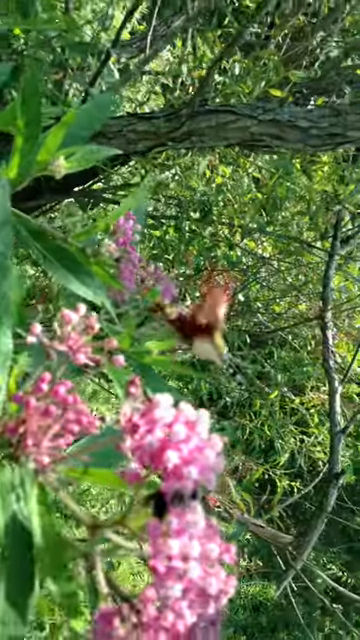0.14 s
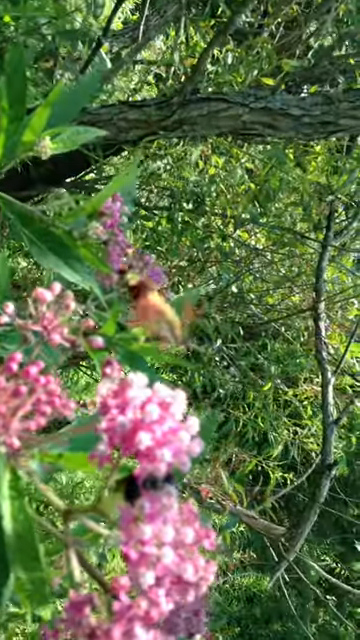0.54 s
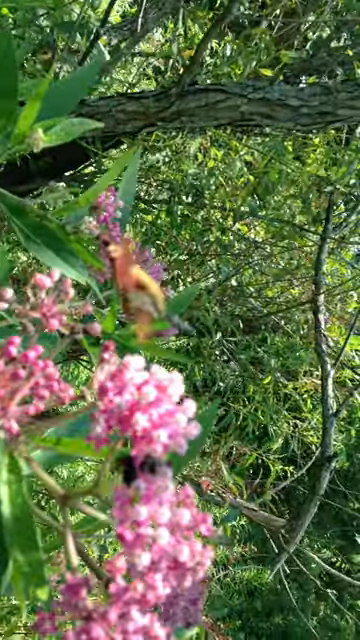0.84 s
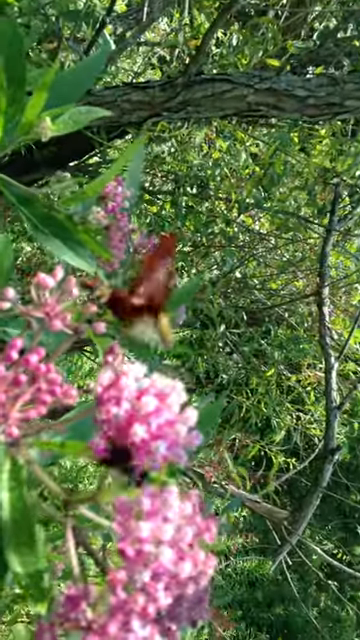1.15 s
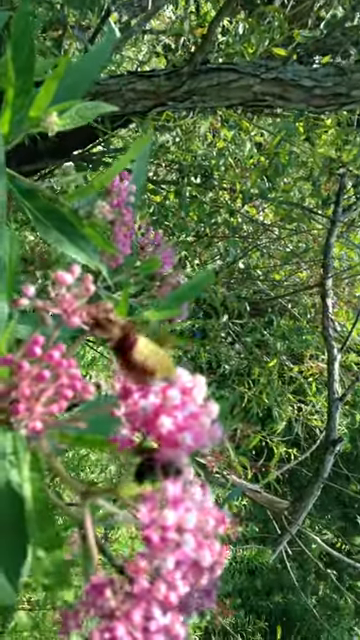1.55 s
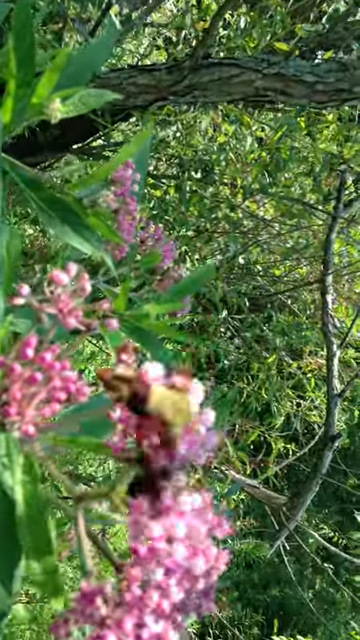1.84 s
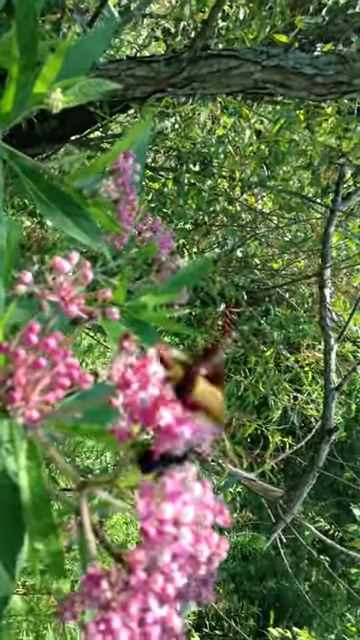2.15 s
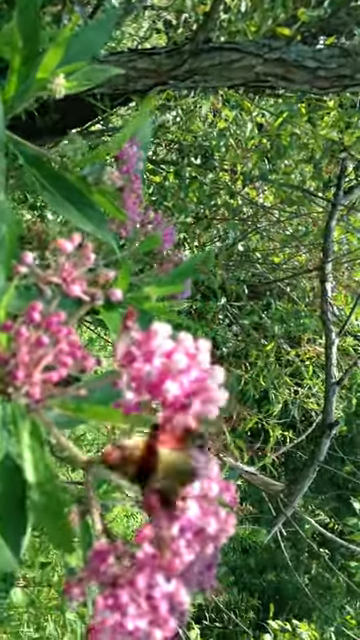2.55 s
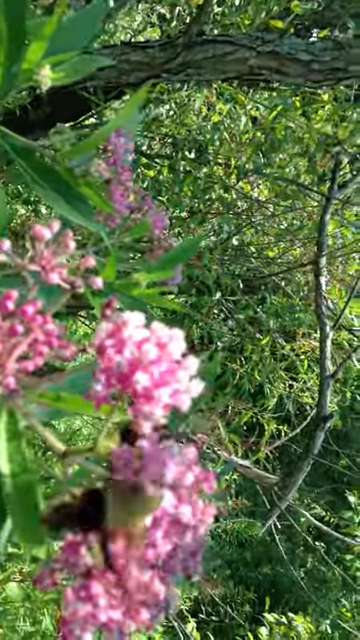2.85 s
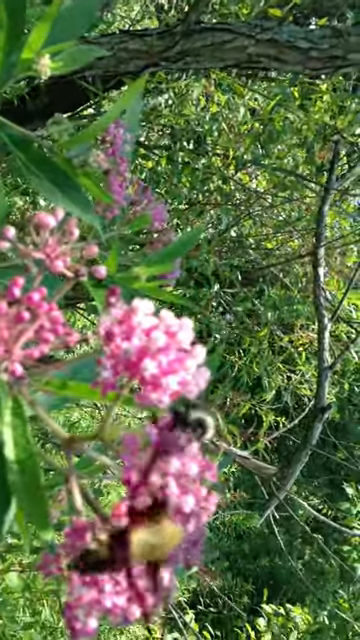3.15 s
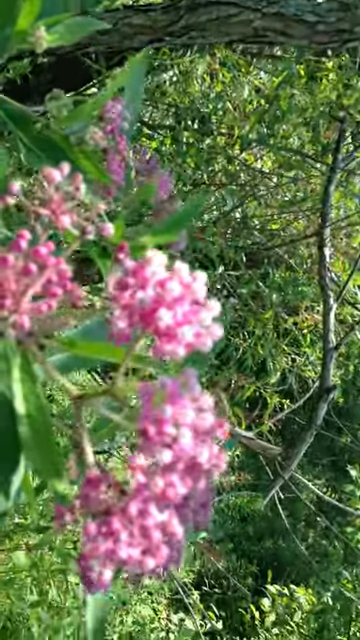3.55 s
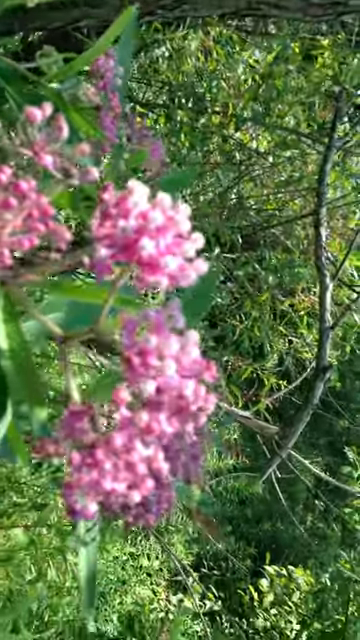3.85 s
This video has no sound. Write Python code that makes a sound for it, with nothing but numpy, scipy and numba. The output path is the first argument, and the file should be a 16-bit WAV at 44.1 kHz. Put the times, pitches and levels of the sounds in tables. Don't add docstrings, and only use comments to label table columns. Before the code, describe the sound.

A bumblebee's low buzz swells suddenly loud close past the microphone after quiet outdoor hiss

```python
import sys
import numpy as np
from scipy import signal
from scipy.fft import rfft, irfft
from scipy.io import wavfile
from scipy.ndimage import uniform_filter1d
from numba import njit

SR = 44100
rng = np.random.default_rng(int(sys.argv[2]) if len(sys.argv) > 2 else 0)


def nominal_scale(level):
    x = np.asarray(level, float) / 20
    return 10 ** x


def generate_wav(sig):
    pcm = np.round(np.clip(np.atleast_2d(sig).T, -1, 1) * 32767).astype(np.int16)
    wavfile.write(sys.argv[1], SR, pcm)


N = 176400

# pitch_hz, density_db (dB per Hz)
AIR_SPECTRUM = [(18, -35), (40, -17.5), (120, -2.5), (320, -7), (520, -10.5), (1240, -18.5), (4200, -17.5),
                (15000, -22.5)]
# start_s, firing_hz, level_db
ENGINE_FIRING = [
    (0, 20.1, -64.5),
    (.5, 20.1, -65),
    (.72, 20.1, -68.5),
    (1.0, 20.1, -66),
    (1.3, 20.1, -68),
    (1.45, 20.1, -74),
    (2.2, 20.1, -73),
    (4, 20.1, -75),
]
# resonance_hz, width_hz, level_db
ENGINE_RESONANCES = [
    (335, 65, 0),
    (410, 130, -5),
    (600, 200, -18),
]
# start_s, level_db, centre_hz
MOTH_PUFFS = [(0, -73, 192), (.3, -84.5, 202), (.5, -63, 189), (.66, -79, 210), (1.05, -71, 222),
              (1.24, -65, 197), (1.4, -74, 218), (1.56, -64, 236), (1.82, -62, 195), (2.0, -62, 225),
              (2.15, -62.5, 219), (2.25, -71, 171), (2.7, -67.5, 210), (3.05, -61.5, 200),
              (3.25, -68.5, 215), (3.47, -64, 171), (3.53, -53.5, 202), (3.6, -69, 185)]
# start_s, peak_db, pitch_hz
PORT_THUMPS = [(0.393, -61, 131), (0.562, -50, 130), (0.591, -51, 130), (1.246, -56, 132),
               (1.606, -49, 127), (1.925, -47.5, 133), (1.982, -62, 132), (2.035, -49.5, 129),
               (2.597, -53, 132), (2.983, -63, 131.7), (3.332, -48.5, 131), (3.496, -47.5, 134.4)]
# peak_s, peak_db, pitch_hz, length_s
MOTH_EDDIES = [(.505, -58.5, 176, 0.021), (.59, -57.5, 174, 0.017), (1.19, -60, 174, 0.011),
               (1.255, -62.5, 150, 0.01), (1.56, -60.5, 237, 0.032), (1.689, -62, 246, 0.023),
               (1.77, -57, 235, 0.014), (1.835, -54.5, 169, 0.012), (1.945, -50, 172, 0.012),
               (1.99, -50.5, 170, 0.0084), (2.035, -50.5, 162, 0.012), (2.141, -57, 270, 0.011),
               (2.175, -59.5, 228, 0.011), (2.985, -52.5, 175, .01), (3.075, -56.5, 184.6, 0.013),
               (3.513, -45, 166, 0.0077), (3.66, -54.5, 175, 0.022)]
# start_s, wing_beat_hz, level_db
FLOWER_FLUTTER = [
    (2.401, 127.3, -73.5),
    (2.619, 127.9, -71.5),
    (2.85, 123.6, -69),
    (3.0, 133.4, -69.5),
    (3.119, 135.7, -67.5),
    (3.23, 136.8, -68),
    (3.28, 138.2, -62.5),
    (3.33, 137.8, -58.5),
    (3.359, 132.4, -66.5),
]
# peak_s, peak_db, colour_hz, length_s
PETAL_BRUSHES = [(2.6379, -49, 6000, .0007), (2.6461, -44.5, 7000, .0014), (2.6495, -52, 5000, .001),
                 (2.6559, -47, 6000, .0006), (2.8215, -54, 9000, .0008), (2.8245, -52, 3000, .001),
                 (2.838, -55, 4500, .0008), (2.854, -52, 7000, .001), (2.862, -54, 8000, .0006),
                 (2.8698, -49.5, 7000, .0007), (2.878, -51, 7000, .001), (2.886, -54, 3500, .001),
                 (2.9114, -41.5, 8000, .0004), (2.9175, -52, 9000, .0007), (2.9202, -51, 3500, .0005),
                 (2.963, -54, 4000, .0008), (2.991, -53, 4000, .0006), (3.1147, -52, 2500, .0006),
                 (3.1195, -47, 5000, .0005), (3.1233, -51, 9500, .0006), (3.1288, -47, 6000, .0009),
                 (3.159, -52, 4000, .001), (3.166, -52, 7000, .0005), (3.1895, -48, 5000, .0007),
                 (3.1947, -45.5, 7500, .0005), (3.197, -47, 6500, .0005), (3.2165, -52, 8000, .001),
                 (3.2226, -47.5, 9500, .0009), (3.232, -52, 7000, .0007), (3.3188, -45, 6000, .0005),
                 (3.3255, -44, 8500, .0013), (3.3324, -42.5, 6500, .0011), (3.8237, -47, 9000, .0006),
                 (3.8317, -48, 9000, .0006), (3.8399, -41, 2500, .0006), (3.8486, -47, 4000, .0006),
                 (3.87, -39, 7500, .0008), (3.8776, -44, 7000, .0008), (3.886, -43, 10000, .0007),
                 (3.8921, -41, 7500, .0006), (3.8952, -44, 5500, .0007), (3.9003, -43, 7000, .0006),
                 (3.9078, -43, 6000, .001), (3.916, -40, 7000, .0007), (3.9201, -46, 6000, .0007),
                 (3.9315, -47, 5500, .0007), (3.9362, -47, 5000, .0006)]
# start_s, peak_db, pitch_hz
STEM_TICKS = [
    (3.0048, -52, 1850),
    (3.1878, -54, 1860),
    (3.4062, -55, 1532),
]
# start_s, wing_beat_hz, level_db
HOP_BUZZ = [
    (3.425, 120, -85),
    (3.442, 124, -59),
    (3.455, 127, -55.5),
    (3.478, 136, -55.5),
    (3.495, 128, -58),
    (3.512, 122, -75),
]
# start_s, wing_beat_hz
FLIGHT_BEAT = [(3.58, 116.5), (3.645, 119.5), (3.71, 139.5), (3.73, 142.5), (3.776, 142), (3.812, 132),
               (3.848, 116.5), (3.868, 115), (3.885, 122), (3.9, 127), (3.925, 131), (3.952, 119),
               (4.0, 108)]
# start_s, level_db, facing_db (odd partials over even), bright_db (per octave), lowest_partial_db
FLIGHT_APPROACH = [
    (3.58, -64.5, 3, 3, 3.5),
    (3.65, -64.5, 2, 7.5, 2),
    (3.69, -60, -4, 1.5, -4),
    (3.72, -53, -4, -2.5, -11),
    (3.745, -50, 1, -1.5, -2),
    (3.762, -48, 1, -1, -1.5),
    (3.78, -43.5, 7, 0, 6.5),
    (3.8, -40.5, 9, 0.5, 3),
    (3.82, -37, -4, -0.5, 7),
]
# start_s, level_db, facing_db (odd partials over even), bright_db (per octave), lowest_partial_db
FLIGHT_PASS = [
    (3.85, -36, -7, 7, 10),
    (3.877, -38.5, -6, -1, 4),
    (3.897, -28.5, -2, -5, -10),
    (3.912, -29, 1, -3, -4),
    (3.925, -29.5, 7, 6, 7),
    (3.94, -30.5, -3, -2, -7),
    (3.957, -36, -8, -5, -12),
    (3.975, -44, -6, -6, -13),
    (4.0, -57, 0, 0, -4),
]
# multiple, level_db
FAR_PARTIALS = [(1, 0), (2, -6), (3, -13), (4, -17), (5, -12), (6, -19), (7, -27), (8, -26), (9, -22),
                (10, -24), (11, -29), (12, -29), (13, -31), (14, -32), (15, -32), (16, -32), (17, -33),
                (18, -34)]
# multiple, level_db
NEAR_PARTIALS = [(1, 0), (2, 4), (3, 0), (4, -8), (5, -11), (6, -26), (7, -32), (8, -34), (9, -38),
                 (10, -44), (11, -46), (12, -46.5), (13, -50), (14, -52), (15, -53), (16, -54), (17, -55),
                 (18, -56)]


def unit(x):
    return x / np.sqrt(np.mean(x ** 2))


def curve(table):
    rows = np.array(table, float)
    return [np.interp(np.arange(N) / SR, rows[:, 0], col) for col in rows.T[1:]]


@njit
def state_variable_band(x, hz, width_hz):
    out, band_state, low_state = np.empty(len(x)), 0., 0.
    for i in range(len(x)):
        g = np.tan(np.pi * hz[i] / SR)
        damping = width_hz[i] / hz[i]
        v = (band_state + g * (x[i] - low_state)) / (1 + g * (g + damping))
        band_state = 2 * v - band_state
        low_state += 2 * g * v
        out[i] = damping * v
    return out


def band(x, hz, width_hz):
    flat = np.zeros(len(x))
    return state_variable_band(x, np.clip(hz, 20, SR / 2.3) + flat, np.maximum(width_hz, 5) + flat)


def walk(rate_hz):
    hold = int(SR / rate_hz)
    steps = rng.standard_normal(N // 300)[np.arange(N) // hold]
    return unit(uniform_filter1d(uniform_filter1d(steps, hold), hold))


def air():
    f = np.fft.rfftfreq(N, 1 / SR)[1:]
    hz, density_db = np.array(AIR_SPECTRUM).T
    shape = nominal_scale(np.interp(np.log(f), np.log(hz), density_db))
    out, swell = 0, walk(0.88)
    for centre in 40 * 2. ** np.arange(10):
        octaves_away = np.abs(np.log2(np.minimum(f / centre, 2)))
        part = np.append(0, shape * np.sqrt(np.clip(1 - octaves_away, 0, 1)))
        hiss = irfft(rfft(rng.standard_normal(N)) * part, N)
        out = out + hiss * nominal_scale(0.057 * swell + 0.66 * walk(14))
    return unit(out) * nominal_scale(-65)


def engine():
    hz, db = curve(ENGINE_FIRING)
    phase = np.cumsum(hz) / SR + .004 * np.cumsum(walk(20)) / 2000 + .88
    firing = np.exp(-(phase % 1) / .1)
    weaker = .45 * np.exp(-((phase + .45) % 1) / .11)
    puffs = (firing + weaker) * (2.2 + 1.8 * rng.standard_normal(N))
    puffs = (puffs + .9 * rng.standard_normal(N)) * nominal_scale(1.5 * walk(20))
    body = 0
    for centre, width, level in ENGINE_RESONANCES:
        body = body + nominal_scale(level) * unit(band(band(puffs, centre, width), centre, 2.16 * width))
    return unit(body) * nominal_scale(db)


def moth():
    db, hz = curve([*MOTH_PUFFS, (3.66, -74, 193), (3.8, -51, 166)])
    puffs = rng.standard_normal(N) * nominal_scale(3.6 * walk(45))
    hz = hz * (1 + 0.084 * walk(12))
    return unit(band(band(puffs, hz, 0.6 * hz), hz, 1.36 * hz)) * nominal_scale(db - 0.5)


def thumps():
    out, t = np.zeros(N), np.arange(2000) / SR
    for s, db, hz in PORT_THUMPS:
        push = t * hz * np.exp(-t * hz * 3.7)
        out[int(s * SR):][:2000] += 6.3 * nominal_scale(db) * np.sin(2 * np.pi * hz * t) * push
    return out


def eddies():
    t, sway = np.arange(N) / SR, .5 * walk(60)
    out = np.zeros(N)
    for s, db, hz, length in MOTH_EDDIES:
        swell = np.exp(-((t - s) / length) ** 2)
        out += nominal_scale(db) * swell * np.sin(2 * np.pi * hz * (t - s) + sway)
    return out


def swish(phase, share, hz):
    gate = 0.49 + np.exp(-phase / share) * nominal_scale(1.57 * walk(120))
    return gate * unit(band(rng.standard_normal(N), hz, 8.0 * hz))


def foraging_bee():
    hz, db = curve([(2.2, 127.3, -110), *FLOWER_FLUTTER, (3.7853, 77.5, -110)])
    phase = np.cumsum(hz * (1 + 0.018 * walk(60))) / SR % 1
    stroke = (np.exp(-phase / 0.055) - .12) * nominal_scale(1.1 * walk(110))
    puffs = stroke * (0.85 + rng.standard_normal(N) * 5.9)
    flutter = unit(band(band(puffs, 390, 800), 430, 1200))
    return nominal_scale(db) * (flutter + nominal_scale(1.0) * swish(phase, .15, 2300))


def petals():
    size, lead_s = 900, .004
    out, t = np.zeros(N + size), np.arange(size) / SR
    late = t - lead_s
    for s, db, hz, length in PETAL_BRUSHES:
        rustle = rng.standard_normal(size) * np.exp(np.where(late < 0, 4 * late, -late) / length)
        rustle[int(lead_s * SR)] = 3
        rustle = band(band(rustle, hz, 2.2 * hz), 6500, 17000)
        out[int((s - lead_s) * SR):][:size] += nominal_scale(db) * rustle / np.abs(rustle).max()
    for s, db, hz in STEM_TICKS:
        out[int(s * SR):][:size] += nominal_scale(db) * np.sin(2 * np.pi * hz * t) * np.exp(-t / 0.0018)
    return out[:N]


def wings(hz, db, facing_db, bright_db, root_db):
    turns = np.cumsum(uniform_filter1d(hz, size=600) * (1 + 0.004 * walk(90))) / SR
    far_below_db, near_above_db = -46, -33.5
    close = np.clip((db - far_below_db) / (near_above_db - far_below_db), 0, 1)
    close = np.maximum.accumulate(close)
    gains = []
    for (k, far), (_, near) in zip(FAR_PARTIALS, NEAR_PARTIALS):
        level = far + close * (near - far) + bright_db * np.log2(min(k, 6))
        level = level + facing_db * (k % 2) * (k < 6) + root_db * (k == 1)
        gains.append(nominal_scale(level))
    gains = np.array(gains)
    gains *= np.sqrt(2) * nominal_scale(db) / np.sqrt(np.sum(gains ** 2, axis=0))
    tone = np.zeros(N)
    for gain, (k, _) in zip(gains, FAR_PARTIALS):
        wobble_db = .8 * (walk(45) + close * min(k - 1, 2) * walk(120))
        odd_lead = .65 * (k % 2)
        drift = (.08 + .25 * close) * np.log(k) * walk(60)
        tone += gain * nominal_scale(wobble_db) * np.cos(2 * np.pi * k * turns + odd_lead + drift)
    return tone, turns % 1


def hop():
    hz, db = curve([(3.4, 120, -130), *HOP_BUZZ, (3.54, 120, -130)])
    tone, _ = wings(hz, db, facing_db=0, bright_db=-6, root_db=-28)
    return tone


def flying_bee():
    hz, = curve(FLIGHT_BEAT)
    db, facing, bright, root = curve([(3.45, -90, 0, 0, 0), *FLIGHT_APPROACH, *FLIGHT_PASS])
    tone, phase = wings(hz, db, facing, bright, root)
    start = np.clip((db + 98) / 22, 0, 1)
    hiss_db = -59.5 + .3 * (db + 38.0)
    hiss = start * nominal_scale(hiss_db) * swish(phase, .2, 2000)
    gusts = rng.standard_normal(N) * nominal_scale(1.4 * walk(120))
    low_push = unit(band(band(gusts, 290, 320), 273, 440))
    draught = low_push + nominal_scale(-18) * unit(band(gusts, 1300, 1300))
    return tone + hiss + draught * nominal_scale(db - 15.5)


def scene():
    wood = air() + engine()
    moth_air = moth() + thumps() + eddies()
    bee = foraging_bee() + petals() + hop() + flying_bee()
    return (wood + moth_air + bee)[None]


def top_cut(x):
    return signal.sosfilt(signal.butter(12, 15340, fs=SR, output="sos"), x)


def record(dry):
    x = signal.sosfilt(signal.butter(2, 80, "high", fs=SR, output="sos"), dry)
    x = signal.sosfilt(signal.ellip(8, .3, 60, 15350, fs=SR, output="sos"), x)
    return top_cut(x)


dry = scene()
out = record(dry)
generate_wav(out)
```